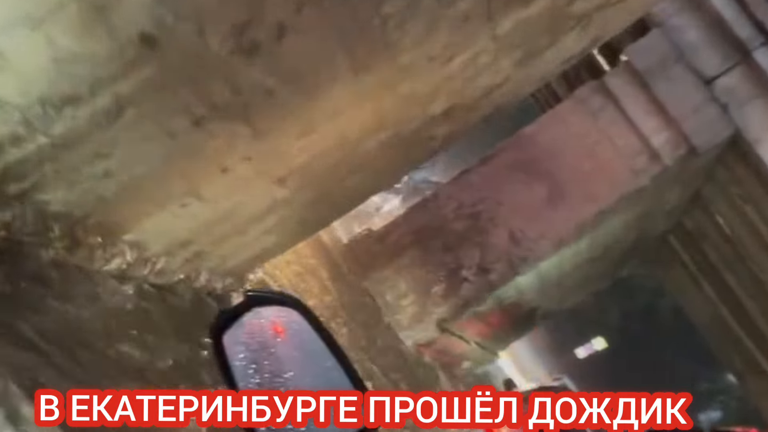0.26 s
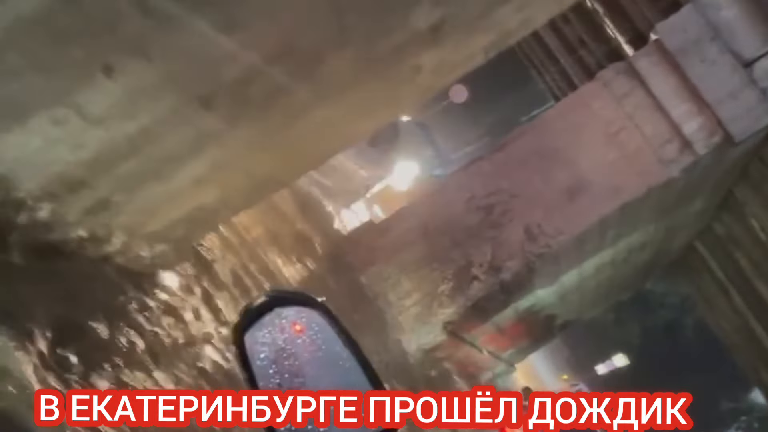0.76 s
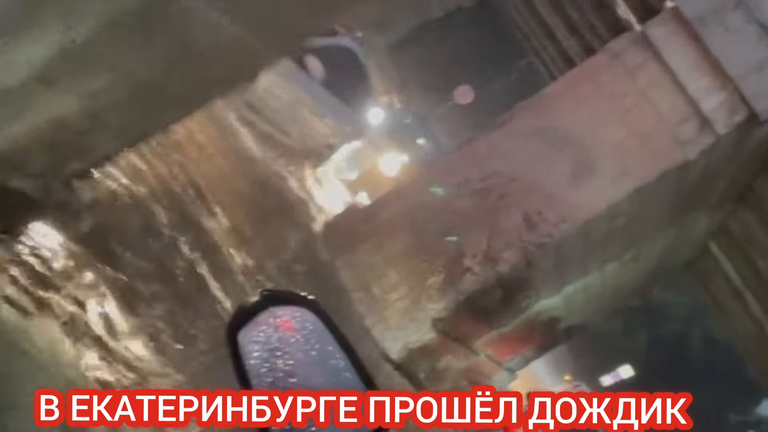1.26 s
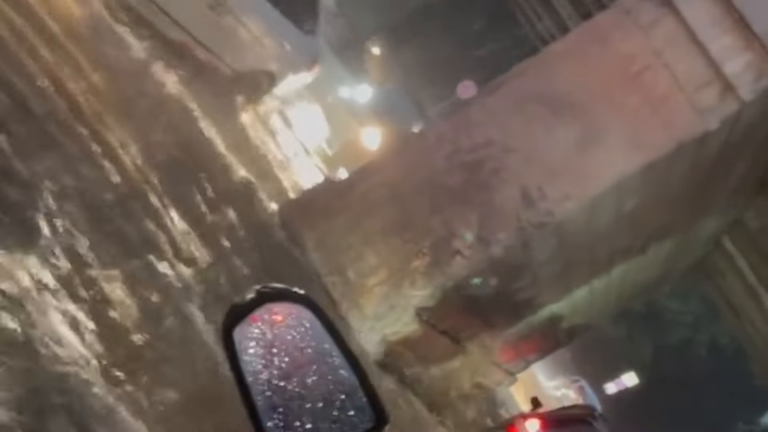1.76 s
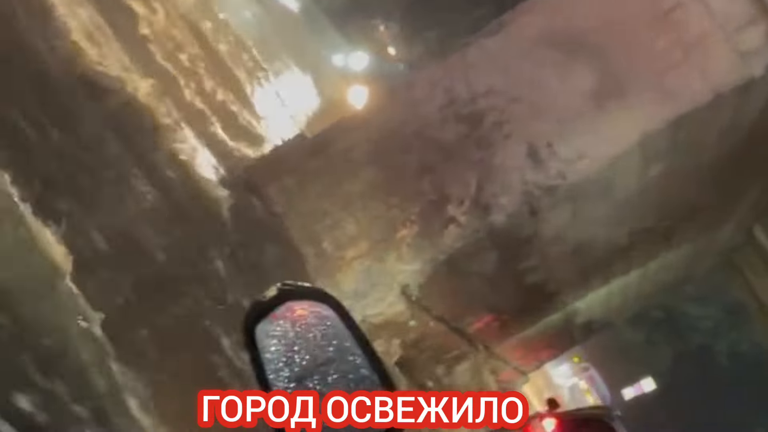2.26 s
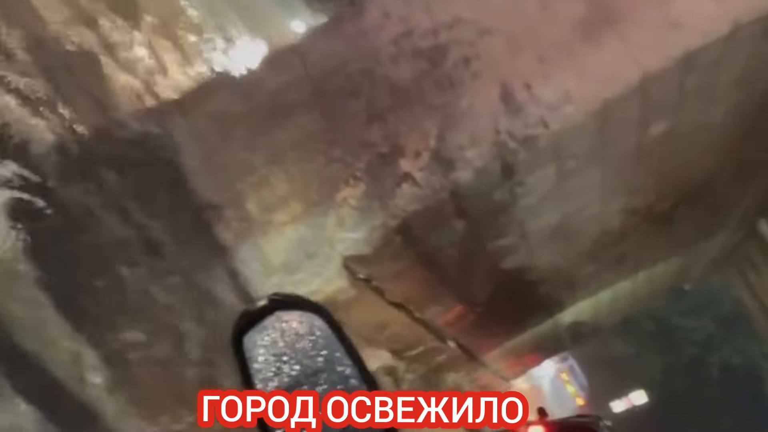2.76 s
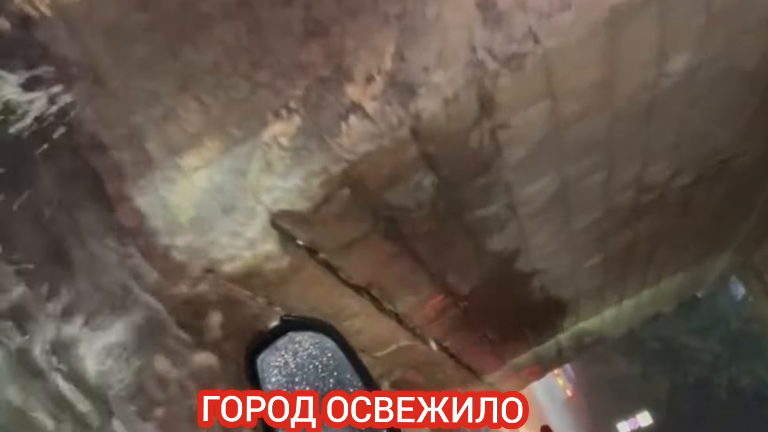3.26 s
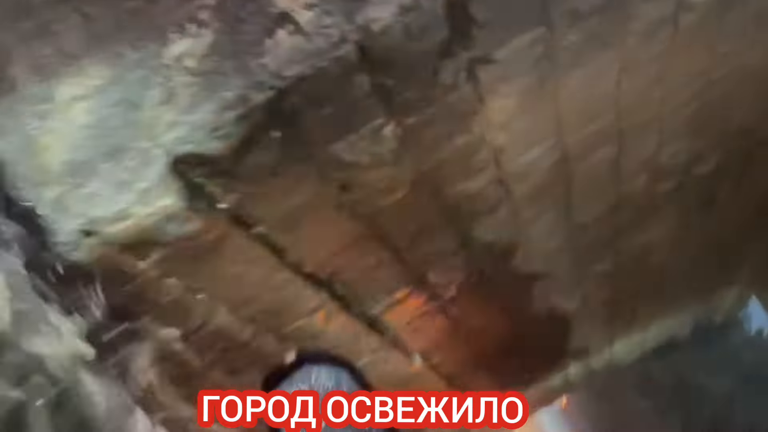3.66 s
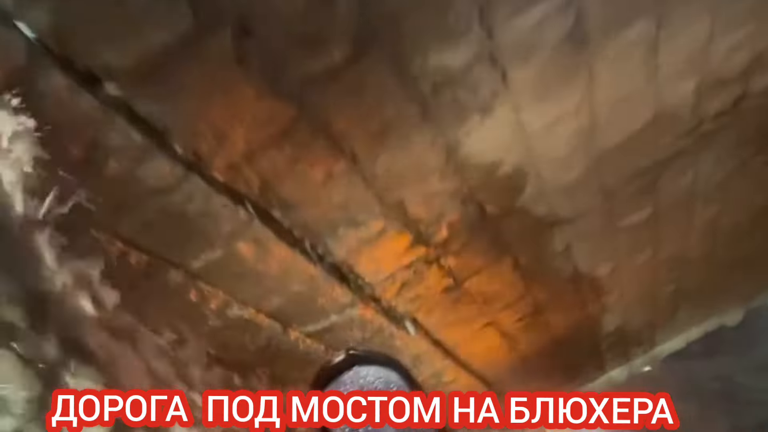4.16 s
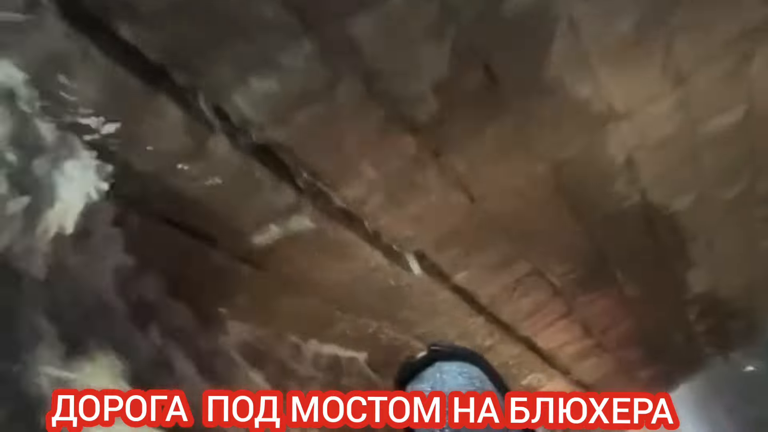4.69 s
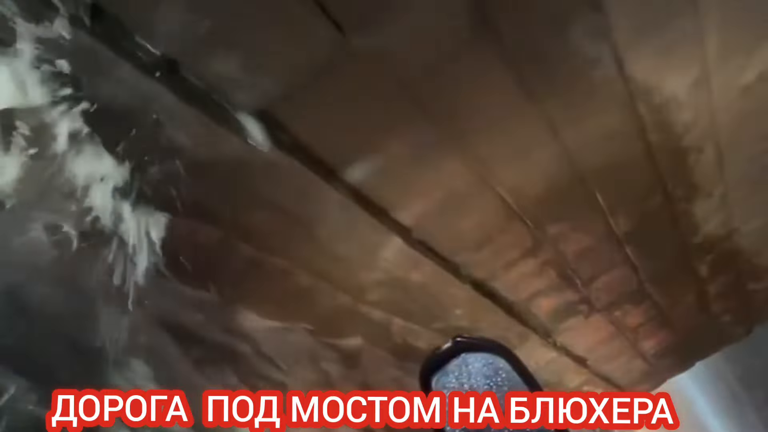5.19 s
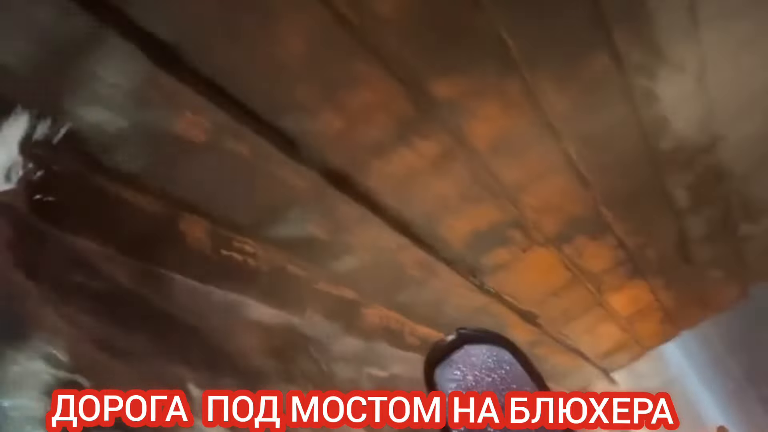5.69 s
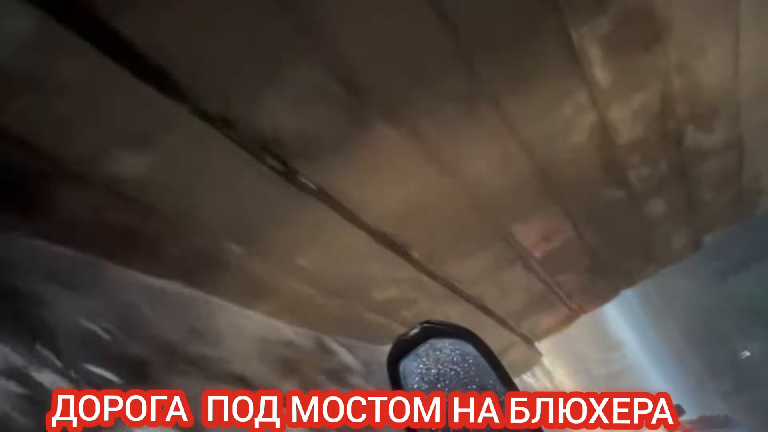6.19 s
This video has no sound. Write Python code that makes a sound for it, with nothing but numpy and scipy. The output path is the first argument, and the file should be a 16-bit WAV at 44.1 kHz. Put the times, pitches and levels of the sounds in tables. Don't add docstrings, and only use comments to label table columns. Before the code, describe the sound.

Close, wide stereo handset sound of a car wading through deep water in the rain. Continuous churning and hissing swells in waves, with hollow drumming under the floor and a faint cabin boom. One short hard knock lands near the start, drops splat on the door, a thin belt squeal wavers later, then the engine strains and rises amid brighter spray, before the wash eases slightly.

```python
import sys
import numpy as np
from scipy import signal
from scipy.fft import rfft, irfft
from scipy.io import wavfile
from scipy.ndimage import uniform_filter1d

SR = 44100
rng = np.random.default_rng(int(sys.argv[2]) if len(sys.argv) > 2 else 0)


def gain_from_decibels(decibels):
    exponent = np.asarray(decibels, float) / 20
    return 10 ** exponent


def generate_wav(signal):
    frames = np.transpose(np.atleast_2d(signal))
    scaled = np.clip(frames, -1, 1) * 32767
    pcm = np.round(scaled).astype(np.int16)
    wavfile.write(sys.argv[1], SR, pcm)


N = 283984

# time in seconds, bow wave in dB, thrown spray in dB.
FLOOD = [(0.0, -2.5, -3), (0.15, -1.5, -3), (0.5, -3, -3), (0.88, -5, -1.5), (1.22, -1, 0), (1.45, 0, 0.5),
         (1.92, 1, -0.5), (2.87, -0.5, -1.5), (3.16, -0.5, 1.5), (3.5, 0, 0), (3.9, 2.5, 2.5),
         (4.6, 1, 4.5), (4.91, 3, 4), (5.18, 4, 5.5), (5.4, 1.5, 5.5), (5.8, 0, 5), (6.1, -1.5, 4.5),
         (6.44, -3.5, 4.5)]


def evened(x):
    return x / np.sqrt(np.mean(abs(x) ** 2) + 1e-20)


def read(points, hz):
    f, value = np.transpose(points)
    return np.interp(np.log(hz + 1), np.log(f + 1), value)


def follow(rows, t):
    s, *columns = np.transpose(rows)
    return [np.interp(t, s, c) for c in columns]


def add(mix, start_s, sound):
    part = mix[round(start_s * SR):][:len(sound)]
    part += sound[:len(part)]


def resonate(x, hz, width_hz):
    turn = np.exp(2j * np.pi * np.cumsum(hz * np.ones(len(x))) / SR)
    r = np.exp(-np.pi * width_hz / SR)
    smooth = signal.lfilter([1 - r], [1, -r], x / turn + 1e-18)
    return 2 * (turn * smooth).real


def swells(rows, t, rest_db, width_s):
    power = sum(gain_from_decibels(2 * db) * np.exp(-((t - s) / width_s) ** 2) for s, db in rows)
    return 10 * np.log10(power + gain_from_decibels(2 * rest_db))


def layer_db():
    # level in dB, share of the bow wave, share of the thrown spray.
    layers = [
        (-34, 0.64, -.1),
        (-27.5, 1.13, 0.005),
        (-29.5, 0.31, 0.66),
        (-39, .01, 0.8),
    ]
    t = np.arange(N // 256 + 5) * 256 / SR
    wave_db, spray_db = follow(FLOOD, t)
    return t, [db + a * wave_db + b * spray_db for db, a, b in layers]


def water(patchy_db, flicker_db):
    # frequency in Hz, density in dB per Hz.
    rumble = [(20, -42), (32, -6), (58, -8.5), (110, -6.5), (300, -18), (600, -31.5), (1200, -60)]
    churn = [(100, -6.5), (250, -1.5), (550, -2.5), (800, -2.5), (1000, -1), (1400, -6.5), (2200, -9.5),
             (4000, -34)]
    hiss = [(500, -20), (1300, -9), (2200, -2), (2700, -3.5), (3700, -5), (4600, -6.5), (5100, -4.5),
            (6800, -6.5), (9000, -35)]
    spray = [(4000, -34.5), (6500, -24), (8000, 3), (9300, 2), (11300, -2), (11800, -10.5), (12300, -68)]
    # middle in seconds, half length in seconds, pitch in Hz,
    # lift in dB.
    pockets = [(0.6, 0.11, 580, -4), (1.3, 0.072, 610, 3), (2.55, 0.33, 587, 7.5), (3.117, 0.21, 660, 3.5),
               (2.92, 0.35, 1020, 3.5), (3.72, 0.24, 1140, 1.5), (4.4, .2, 1080, -1), (3.95, 0.23, 760, 4),
               (4.68, .15, 780, 1.5), (1.95, 0.22, 1050, 2.5), (5.2, 0.23, 550, 4), (5.57, 0.41, 556, 6),
               (6.3, 0.55, 600, 9.5), (6.3, 0.47, 990, 6), (0.15, 0.18, 1940, -6), (1.27, 0.12, 1900, 2),
               (3.45, 0.28, 1850, 1.5), (4.454, 0.31, 1900, 4), (5.6, 0.37, 1900, 3)]
    pocket_width = 0.33
    frames = N // 256 + 5
    hz = np.fft.rfftfreq(1024, 1 / SR)[:, None]
    t, levels_db = layer_db()

    hollow_db = 0
    for middle_s, half_s, pocket_hz, lift_db in pockets:
        off_pitch = np.log((hz + 1) / pocket_hz) / pocket_width
        off_time = (t - middle_s) / half_s
        hollow_db = hollow_db + lift_db * np.exp(-off_pitch ** 2 - off_time ** 2)

    power = 0
    for shape, level_db, lift_db in zip((rumble, churn, hiss, spray), levels_db, (0, hollow_db, 0, 0)):
        power = power + (evened(gain_from_decibels(read(shape, hz))) * gain_from_decibels(level_db + lift_db)) ** 2

    a, b, c, d, patches, gusts = rng.standard_normal((frames, 513, 6)).T
    patches = uniform_filter1d(patches, size=10, axis=0)
    patches = evened(uniform_filter1d(patches, size=16, axis=1))
    gusts = uniform_filter1d(gusts, size=120, axis=0)
    gusts = evened(uniform_filter1d(gusts, size=4, axis=1))
    treble = np.clip(hz / 9500, .25, 1)
    uneven_db = patchy_db * patches + flicker_db * treble * gusts
    z = np.array([a + 1j * b, c + 1j * d]) * np.sqrt(power) * gain_from_decibels(uneven_db)
    sound = signal.istft(z, nperseg=1024, noverlap=768)[1][:, :N]
    return evened(sound) * np.sqrt(power.mean())


def droplets(per_s, spread_db, level_db):
    size = gain_from_decibels(spread_db * np.minimum(rng.exponential(1, N), 4))
    size = size * (rng.random(N) < per_s / SR)
    kind = rng.integers(0, 16, N)
    out = np.zeros(N)
    for k, hz in enumerate(np.geomspace(2400, 11200, num=16)):
        turns = np.arange(400) * hz / SR
        grain = np.sin(2 * np.pi * turns) * turns * np.exp(-turns / 3.3)
        out += signal.oaconvolve(size * (kind == k), grain)[:N]
    swell_db = follow(FLOOD, np.arange(N) / SR)[1]
    return gain_from_decibels(level_db + swell_db) * evened(out)


def hum(rows, width_hz, wobble, octave_db, clear):
    t = np.arange(rows[0][0], rows[-1][0], 1 / SR)
    hz, level_db = follow(rows, t)
    hz = hz * (1 + wobble * evened(uniform_filter1d(rng.standard_normal(len(t)), size=1500)))
    noise = rng.standard_normal((2, len(t)))
    steady = np.sin(2 * np.pi * np.cumsum(hz) / SR)
    fuzz = evened(resonate(resonate(noise[0], hz, width_hz), hz, width_hz))
    octave_hz = 1.96 * hz
    octave = resonate(noise[1], octave_hz, 1.5 * width_hz)
    octave = evened(resonate(octave, octave_hz, 1.5 * width_hz))
    sound = evened(clear * steady + fuzz) + gain_from_decibels(octave_db) * octave
    out = np.zeros(N)
    add(out, t[0], gain_from_decibels(level_db) * sound * signal.windows.tukey(len(t), .03))
    return out


def engine():
    # time in seconds, level in dB.
    loads = [
        (4.45, -36),
        (4.62, -33),
        (4.96, -31),
        (5.1, -28),
        (5.24, -29.5),
        (5.56, -35),
        (5.8, -35),
        (6.35, -36),
    ]
    # time in seconds, firing rate in Hz, level in dB.
    crawl = [
        (1.1, 45, -48),
        (1.45, 43.5, -39),
        (2.1, 43, -37),
        (2.45, 44.5, -40),
        (2.9, 48, -40),
        (3.25, 51, -45),
        (3.4, 52, -52),
    ]
    pull_s, pull_hz, climb_hz_per_s = 4.2, 48.3, 7.4
    t = np.linspace(pull_s, N / SR, num=200)
    firing_hz = pull_hz + climb_hz_per_s * (t - pull_s)
    pull = np.transpose([t, firing_hz, swells(loads, t, rest_db=-42, width_s=.1)])
    return hum(pull, 1.5, 0.0035, -22.0, 4.5) + hum(crawl, 4.0, 0.01, -22.0, 2.5)


def boom():
    # time in seconds, level in dB.
    waves = [(0.0, -36), (0.17, -36), (1.16, -35), (1.4, -38), (1.56, -35), (1.75, -33), (2.0, -37),
             (2.14, -35), (2.3, -34), (2.5, -36), (2.72, -36), (3.47, -37), (3.8, -35), (3.95, -39),
             (4.3, -37)]
    boom_hz, end_s = 63, 3.9
    t = np.linspace(0, end_s, num=400)
    level_db = swells(waves, t, rest_db=-43.5, width_s=0.04)
    return hum(np.transpose([t, boom_hz + 0 * t, level_db]), 26, .04, -22.0, 0.95)


def belt():
    # time in seconds, pitch in Hz, level in dB.
    squeal = [
        (3.375, 2310, -31),
        (3.41, 2290, -29.5),
        (3.56, 2180, -29.5),
        (3.7, 2165, -32),
        (3.85, 2150, -31.5),
        (4.1, 2110, -33),
        (4.32, 2150, -32),
        (4.53, 2230, -29.5),
        (4.64, 2250, -41),
    ]
    return hum(squeal, 170, 0.006, -6.5, 0.7)


def taps(rows, trim_db):
    out = np.zeros(N)
    t = np.arange(2500) / SR
    for (s, db, hz, t60_s, width_hz), noise in zip(rows, rng.standard_normal((len(rows), 2500))):
        decay = gain_from_decibels(-60 * t / max(t60_s, .002))
        burst = np.sign(noise) * decay * (1 - np.exp(-t / 0.00014))
        burst = resonate(resonate(burst, hz, width_hz), hz, width_hz)
        add(out, s, gain_from_decibels(db + trim_db) * burst / abs(burst).max())
    return out


def splats():
    # time in seconds, peak in dB, centre in Hz, t60 in seconds.
    hits = [(.1727, -23, 5100, .012), (.2696, -20, 4900, .012), (.4718, -14.5, 6000, .007),
            (1.924, -23, 5900, .012), (2.0626, -14, 2700, .008), (2.0627, -11.5, 5100, .008),
            (2.0655, -18, 5200, .012), (4.425, -18, 2400, .12), (4.4345, -17, 3200, .04),
            (4.4375, -17, 5500, .02), (4.446, -16, 2000, .1), (5.21, -18, 2000, .1),
            (5.2355, -16, 4800, .01), (5.2382, -14, 3600, .016), (5.2855, -10, 5100, .014)]
    width_hz = 1900
    return taps([(*row, width_hz) for row in hits], 1.5)


def ticks():
    # time in seconds, peak in dB, centre in Hz.
    hits = [(0.4732, -15.5, 10900), (0.7043, -32, 10100), (0.8935, -22, 10400), (0.898, -26, 10100),
            (0.901, -18, 11000), (1.51, -36, 10000), (1.9305, -35, 9470), (2.3825, -34, 10200),
            (2.5125, -20, 10300), (3.081, -20, 9750), (4.4455, -11, 10400), (4.6803, -21, 10800),
            (4.8335, -20, 10100), (4.8773, -20, 10000), (4.9152, -18, 9740), (5.0404, -16, 9520),
            (5.1506, -22, 10400), (5.4515, -9, 9280), (5.4734, -24, 11100), (5.514, -17, 10900),
            (5.5628, -19, 10700)]
    t60_s, width_hz = .0045, 3500
    return taps([(*row, t60_s, width_hz) for row in hits], 1.9)


def knock():
    # frequency in Hz, level in dB, t60 in seconds.
    modes = [
        (520, 0, .0365),
        (816, 10, .0102),
        (1184, 2.3, .0091),
    ]
    start_s, level_db = .47289, .3
    t = np.arange(2500) / SR
    ring = 0
    for k, (hz, db, t60_s) in enumerate(modes):
        ring = ring + (-1) ** k * gain_from_decibels(db - 60 * t / t60_s) * np.sin(2 * np.pi * hz * t)
    thud = gain_from_decibels(-8.4 - 60 * t / .06) * np.sin(2 * np.pi * 250 * t)
    grip = (1 - np.exp(-(t / .002) ** 2)) * np.exp(-(t / .007) ** 4)
    out = np.zeros(N)
    add(out, start_s, gain_from_decibels(level_db) * (ring + thud) * grip)
    return out


def scene():
    blow = [[1], [0]] * knock()
    patter = droplets(per_s=810, spread_db=7.1, level_db=-51)
    car = belt() + engine() + boom()
    return water(patchy_db=1.15, flicker_db=1.1) + car + patter + splats() + ticks() + blow


def thinned(pair, weak_db, hole_db, top_hz):
    hz, _, z = signal.stft(pair, SR, nperseg=2048, noverlap=1536)
    band = np.arange(len(hz)) // 12
    block = np.arange(z.shape[2]) // 2 * 2
    power = np.add.reduceat(abs(z) ** 2, np.arange(0, len(hz), 12), axis=1) / 12
    power = uniform_filter1d(power, size=2, axis=2)[:, :, block]
    luck_db = rng.standard_normal(power.shape[:0:-1]).T[:, block]
    kept = power > power[::-1] * gain_from_decibels(2 * (weak_db + 4.5 * luck_db))
    loud = abs(z) ** 2 > power.sum(axis=0)[band] * gain_from_decibels(2 * hole_db)
    under_top = hz[:, None] < top_hz * (1 + .012 * luck_db[0])
    z = z * kept[:, band] * loud * under_top
    return signal.istft(z, SR, nperseg=2048, noverlap=1536)[1][:, :N]


def band_limit(x):
    return signal.sosfilt(signal.butter(12, 12350, fs=SR, output="sos"), x)


def record(dry):
    # frequency in Hz, side over mid in dB.
    side_db = [(60, -16), (750, -8.5), (1800, -13.5), (2200, -5.5), (2700, -1.5), (4500, -2), (5350, -10.5),
               (5800, -3), (6300, 3.5), (7100, 18.5), (8200, 21), (9000, 4.5), (9600, -2), (10900, -25)]
    # frequency in Hz, lead of side over mid in radians.
    side_turn = [(1700, -1.4), (1900, 2.05), (7500, 1.63), (8200, -1.65)]
    tied = .7
    hz = np.fft.rfftfreq(N, 1 / SR)
    share = np.arctan(gain_from_decibels(read(side_db, hz)))
    alike, other = rfft(dry) / np.sqrt(1 + (42 / (hz + 1)) ** 9)
    turned = np.exp(1j * read(side_turn, hz)) * alike
    mid = np.cos(share) * alike
    side = np.sin(share) * (tied * turned + np.sqrt(1 - tied ** 2) * other)
    mid, side = thinned(irfft(np.array([mid, side]), N), weak_db=-7.5, hole_db=-10.5, top_hz=11750)
    return band_limit(np.array([mid + side, mid - side]))


dry = scene()
out = record(dry)
generate_wav(out)
```